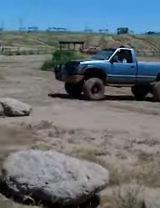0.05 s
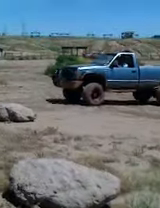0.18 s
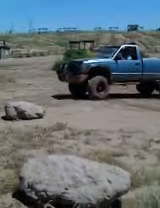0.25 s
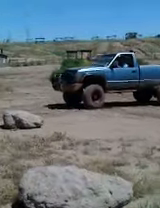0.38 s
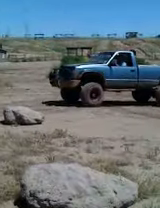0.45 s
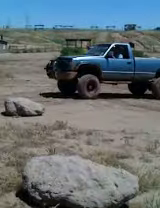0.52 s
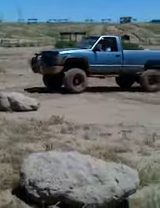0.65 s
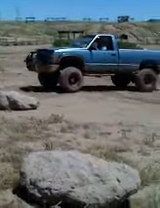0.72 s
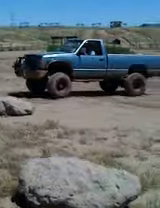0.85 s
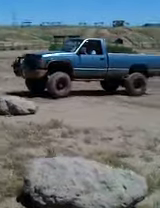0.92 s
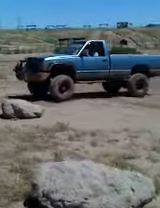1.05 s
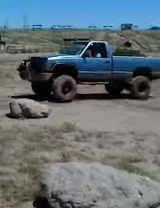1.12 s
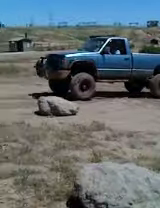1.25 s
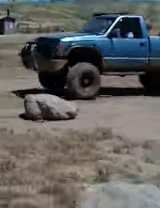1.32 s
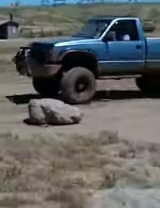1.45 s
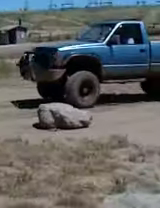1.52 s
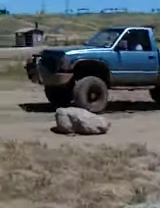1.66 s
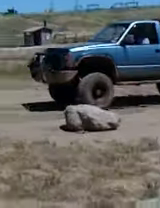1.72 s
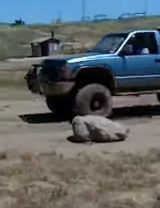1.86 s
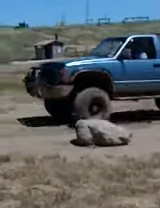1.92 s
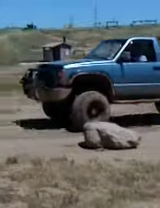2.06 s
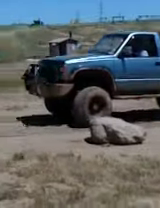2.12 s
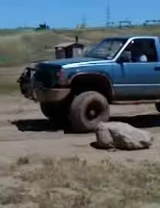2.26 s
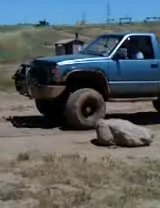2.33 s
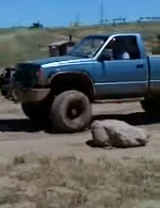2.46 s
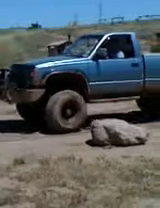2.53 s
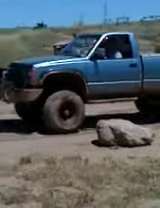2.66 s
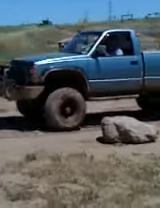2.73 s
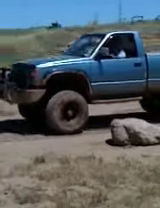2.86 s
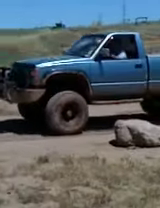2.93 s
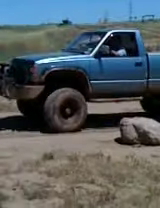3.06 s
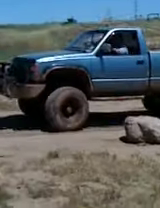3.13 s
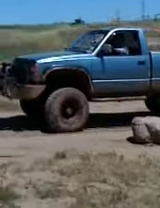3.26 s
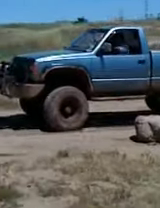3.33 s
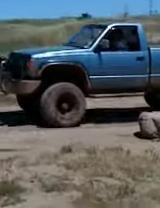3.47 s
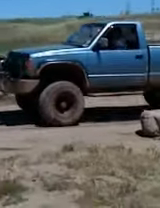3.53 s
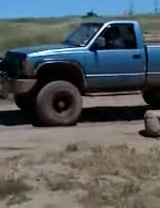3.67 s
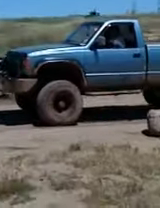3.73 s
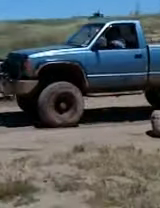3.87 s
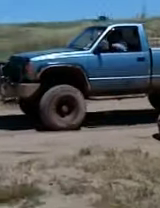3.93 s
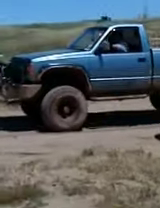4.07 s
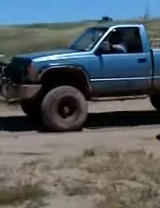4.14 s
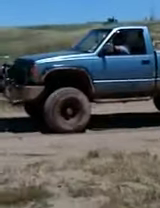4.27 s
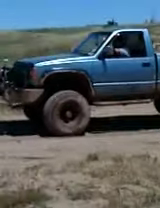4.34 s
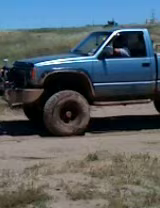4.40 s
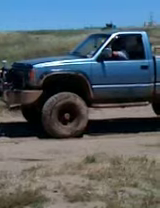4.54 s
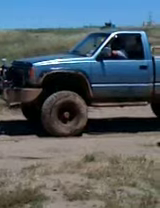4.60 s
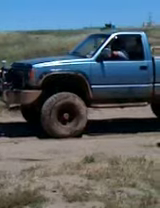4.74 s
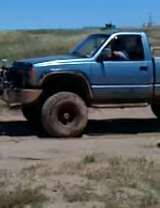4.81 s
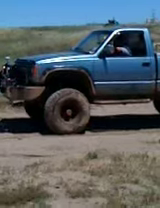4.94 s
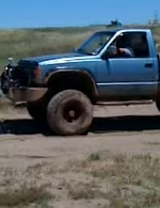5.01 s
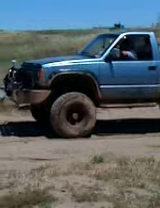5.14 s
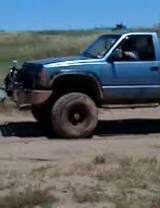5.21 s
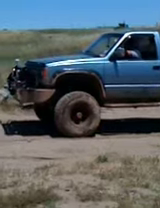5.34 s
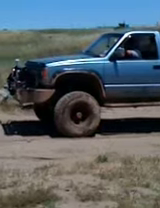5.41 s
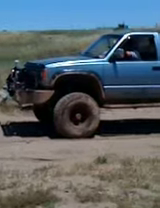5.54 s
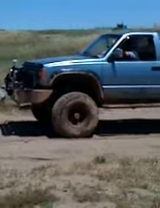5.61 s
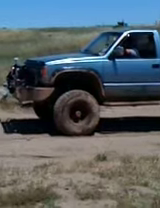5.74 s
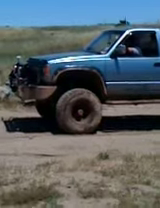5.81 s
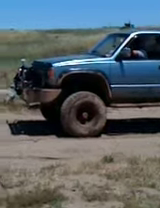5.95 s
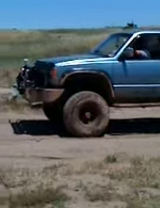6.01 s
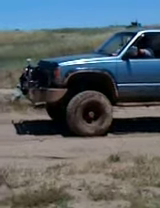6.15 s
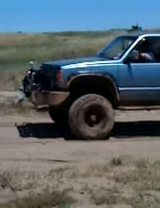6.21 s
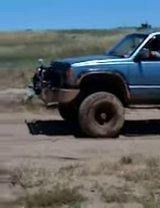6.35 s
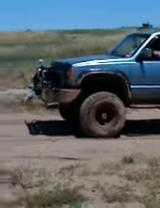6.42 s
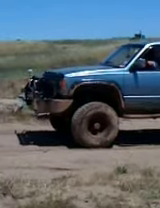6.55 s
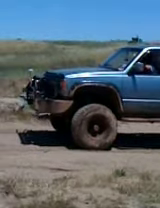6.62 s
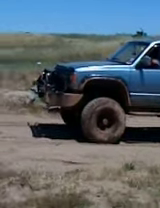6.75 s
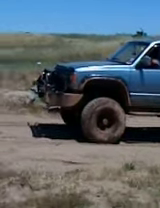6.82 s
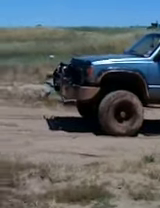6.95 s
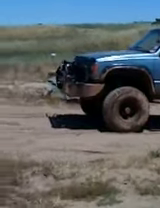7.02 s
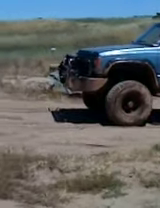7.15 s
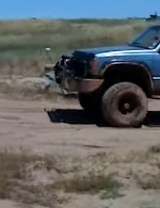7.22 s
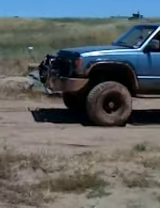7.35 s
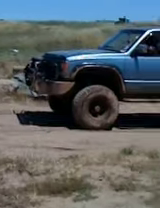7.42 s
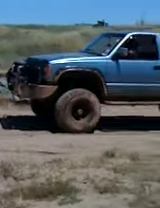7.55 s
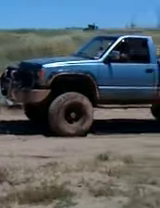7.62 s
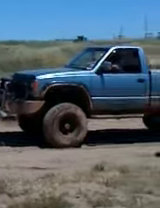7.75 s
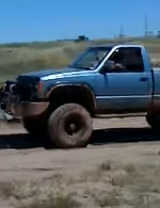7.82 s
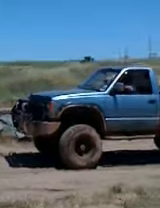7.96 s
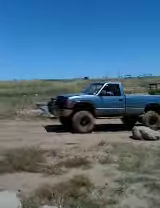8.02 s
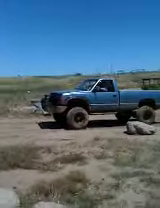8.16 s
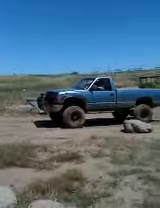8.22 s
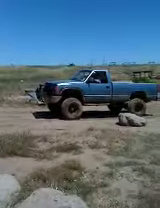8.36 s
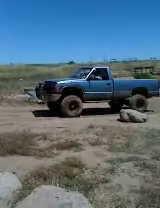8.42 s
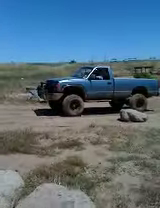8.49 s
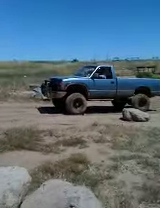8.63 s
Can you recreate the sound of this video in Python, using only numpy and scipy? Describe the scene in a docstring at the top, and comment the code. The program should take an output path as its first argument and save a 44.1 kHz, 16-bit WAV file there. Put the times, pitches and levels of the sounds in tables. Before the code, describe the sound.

A big pickup engine pulls with a deep loping rumble, drops to a slow uneven idle, then backs up over crunching, ticking gravel.

```python
"""Eight-cylinder pickup on a dirt lot

A lifted pickup pulls across gravel, lifts off to a hunting idle and backs up, some metres from the microphone.
Firing pulses alternate unevenly between two exhaust banks and, through pipe filters, give a loping rumble.
Shaped noise makes tyre hiss, dust, engine bay, gravel crunch, scrapes, murmur and a light wind;
short bursts and decaying sines make stones and rattles; sines make spring squeaks, tones near 12 kHz and hums.
"""
import sys
import numpy as np
from scipy import signal
from scipy.fft import rfft, irfft
from scipy.io import wavfile
from scipy.ndimage import uniform_filter1d

SR = 44100
rng = np.random.default_rng(int(sys.argv[2]) if len(sys.argv) > 2 else 0)


def rack_gain(trim_db):
    """Turn a fader trim in dB into the linear factor to multiply a signal by."""
    fader = np.asarray(trim_db, float)
    return 10 ** (fader / 20)


def bounce(signal):
    """Save signal as a 16-bit WAV file at the path given by the first command-line argument."""
    frames = np.transpose(np.atleast_2d(signal))
    limited = np.clip(frames, -1, 1)
    pcm = np.round(limited * 32767).astype(np.int16)
    wavfile.write(sys.argv[1], SR, pcm)


N = 382523
TIME = np.arange(N) / SR

# tyre hiss, louder where they roll faster or over loose ground: start_s, hiss_rms_db
TYRE_ROLL = [(0, -58.5), (0.6, -57), (1.6, -55.5), (2.3, -59.5), (3.2, -62.5), (3.36, -59.5), (3.92, -59),
             (4.1, -61.5), (5.33, -63), (5.45, -60), (5.72, -60.5), (5.95, -62), (6.8, -61.5),
             (7.55, -58.5), (8, -59), (8.5, -58), (8.67, -58)]


def colour(x, points):
    """Minimum-phase filter whose gain follows (hz, db) points."""
    size = 2 ** 16
    hz, db = np.transpose(points)
    grid_hz = np.maximum(np.arange(size // 2 + 1) * SR / size, 1)
    gain = rack_gain(np.interp(np.log(grid_hz), np.log(hz), db))
    cepstrum = irfft(np.log(gain))
    # fold onto positive time: causal response
    cepstrum[1:size // 2] *= 2
    cepstrum[size // 2 + 1:] = 0
    response = irfft(np.exp(rfft(cepstrum)))[:size // 2]
    return signal.fftconvolve(x, response)[:len(x)]


def unit(x):
    """Scale to rms 1."""
    return x / np.sqrt(np.mean(x ** 2))


def walk(rate_hz):
    """Random levels held 1 / rate_hz s, smoothed twice over that time."""
    hold = int(SR / rate_hz)
    steps = np.repeat(rng.standard_normal(N // hold + 1), hold)
    return 1.3 * uniform_filter1d(uniform_filter1d(steps, hold), hold)[:N]


def curve(table):
    """Columns of a table joined by straight lines in time."""
    s, *columns = np.transpose(table)
    return [np.interp(TIME, s, c, left=c[0], right=c[-1]) for c in columns]


def heaps(table):
    """One gain line per dB column of (middle_s, length_ms, db, ..) rows: each row is a Gaussian swell."""
    total = 0
    for middle_s, length_ms, *dbs in table:
        swell = np.exp(-((TIME - middle_s) * 2000 / length_ms) ** 2)
        total = total + rack_gain(np.array(dbs))[:, None] * swell
    return total


def gritty(spread_db, share):
    """Noise in which a share of the samples stands out as grit."""
    excess = np.minimum(rng.exponential(size=N), 3) * (rng.random(N) < share)
    return rng.standard_normal(N) * rack_gain(spread_db * excess)


def band(hz, width_hz):
    """Noise in one resonance, rms 1."""
    return unit(signal.lfilter(*signal.iirpeak(hz, hz / width_hz, fs=SR), rng.standard_normal(N)))


def loads():
    """Shares of pulling, idling and backing, which fade into each other as the driver lifts off and backs up."""
    lift_s, lift_fade_s = 2.21, 0.019
    back_s, back_fade_s = 6.82, 0.012
    lifted = 0.5 + 0.5 * np.tanh((TIME - lift_s) / lift_fade_s)
    backing = 0.5 + 0.5 * np.tanh((TIME - back_s) / back_fade_s)
    return np.array([1 - lifted, lifted - backing, backing])


def firing_rate():
    """Firings per second: eight in each engine cycle."""
    # engine speed: start_s, cycles_per_s
    engine_speed = [(0, 8.67), (0.8, 8.67), (1.4, 8.51), (1.9, 8.65), (2.06, 8.48), (2.36, 5.99),
                    (2.6, 5.26), (2.95, 4.89), (3.2, 5.12), (3.5, 5.67), (3.7, 5.59), (4.4, 5.2),
                    (4.85, 4.6), (5.3, 5.2), (5.6, 5.12), (6.1, 4.64), (6.53, 4.69), (7.03, 6.2),
                    (7.3, 6.4), (8.67, 5.93)]
    return 8 * curve(engine_speed)[0]


def engine():
    """One pulse a firing; what the banks share and what they alternate leave through different pipe colours."""
    # firing strength: start_s, level_db
    throttle = [(0, -0.64), (2.05, 1.5), (2.17, -4), (2.3, 2.5), (2.5, -0.4), (3, 0.2), (4.3, 2),
                (4.8, -0.8), (5.3, 2), (5.8, -1.5), (6.7, 0.5), (7, 2), (8.67, -0.9)]
    # exhaust bank of each firing in the cycle, as a sign
    bank_signs = (1, -1, -1, 1, -1, 1, 1, -1)
    # strength of each firing in the cycle: level_db
    cylinder_db = [0.5, 0.9, -0.6, 0.3, -0.9, 0.6, -0.4, 0.8]
    # exhaust pipe gain, shared by both banks / bank difference: hz, pulling_both_db, pulling_difference_db,
    # idling_both_db, idling_difference_db, backing_both_db, backing_difference_db
    pipes = np.array([(15, -60, -76, -70, -80, -65, -77), (30, -48, -61, -55, -65, -50, -62),
                      (38, -43, -52, -50, -56, -49, -52), (45, -44, -47, -45, -56, -48, -54),
                      (53, -44, -43, -50, -56, -47, -54), (60, -30, -40, -51, -40, -42, -45),
                      (68, -28.5, -36, -51, -37.5, -48, -35), (79, -31, -32, -49, -39, -49, -38),
                      (89, -32, -29.5, -47, -44, -46, -43), (98, -33, -33, -44, -54, -51, -50),
                      (106, -33, -40, -44, -50, -57, -55), (114, -35, -43, -40, -42, -56, -63),
                      (122, -36, -45, -39, -56, -54, -60), (130, -37, -46, -50, -64, -54, -62),
                      (140, -39, -55, -60, -70, -58, -67), (155, -62, -69, -69, -70, -69, -75),
                      (180, -70, -62, -73, -68, -81, -76), (210, -72, -71, -76, -70, -95, -70),
                      (232, -75, -58, -78, -72, -98, -71), (260, -78, -66, -80, -73, -100, -72),
                      (500, -90, -90, -90, -90, -90, -90), (2000, -150, -150, -150, -150, -150, -150)])
    # rows pulling, idling, backing: start_turn_cycles, difference_lag_s, pulse_sign, firing_scatter_db
    load_states = [(0.087, 0.005, 1, 0.2), (0.987, 0.004, -1, 0.7), (0.658, 0.005, -1, 0.5)]
    # unequal pipe runs, a pattern over four firings; rows pulling, idling, backing: four strengths_db
    collector_db = [(2.4, -2.4, 2.4, 0.2), (1, -1.5, 0.5, 1.7), (2.7, -4.1, 1.7, 1.3)]
    # same pattern and rows: four latenesses_ms
    collector_ms = [(-0.57, 0.2, 0.51, -0.13), (0.11, -0.15, 0.04, 0), (-0.13, -0.73, 0.7, 0.16)]

    lead = SR // 2  # samples; the engine already runs before the first moment
    rate = firing_rate()
    count = np.cumsum(rate) / SR
    scatter = rng.standard_normal((int(count[-1]) + 9, 3)).T
    level_db = curve(throttle)[0]
    known_count = np.r_[-rate[0] * lead / SR, count]
    known_sample = np.arange(N + 1) + np.r_[0, np.full(N, lead - 1)]
    bank_scale = 8 / np.abs(np.fft.fft(bank_signs)[3])  # by the pattern's third harmonic
    rumble = 0
    for state, (share, (turn, lag_s, sign, scatter_db)) in enumerate(zip(loads(), load_states)):
        firing = np.arange(-8, int(count[-1] + 8 * turn))
        spot = np.interp(firing - 8 * turn, known_count, known_sample).astype(int)
        at = np.maximum(spot - lead, 0)
        db = level_db[at] + np.take(cylinder_db, firing % 8) + scatter_db * scatter[state, firing]
        pulses = np.zeros(N + lead)
        pulses[spot] = sign * share[at] * rack_gain(db) * SR / rate[at] / np.sqrt(2)

        difference = np.zeros(N + SR)
        difference[spot + int(lag_s * SR)] = pulses[spot] * np.take(bank_signs, firing % 8) * bank_scale

        shared = np.zeros(N + SR)
        late_samples = np.take(collector_ms[state], firing % 4) * SR / 1000
        late_spot = np.maximum(spot + late_samples, 0).astype(int)
        shared[late_spot] = pulses[spot] * rack_gain(np.take(collector_db[state], firing % 4))

        rumble = rumble + colour(shared, pipes[:, [0, 1 + 2 * state]])[lead:lead + N]
        rumble = rumble + colour(difference, pipes[:, [0, 2 + 2 * state]])[lead:lead + N]
    return rumble


def engine_bay():
    """Roar and growl: noise puffing with each firing and once a cycle."""
    # start_s, roar_rms_db, growl_rms_db
    bay_levels = [(0, -56.5, -68), (0.7, -53, -60.5), (1.3, -57.5, -64), (1.95, -50.5, -62.5),
                  (2.4, -58.5, -62), (2.95, -67.5, -77), (3.6, -62.5, -75.5), (4.4, -66.5, -64.5),
                  (5.2, -69.5, -65), (5.7, -72.5, -77), (6.6, -70, -80), (7.1, -64, -65), (7.3, -68, -61),
                  (7.41, -54, -52.5), (7.6, -65.5, -58), (8.2, -62.5, -68), (8.67, -79, -85)]
    # spectrum, relative: hz, db_per_hz
    roar_colour = [(250, -14), (380, -7), (460, -2.5), (570, 2), (640, -1), (700, -2), (780, -7.5),
                   (950, -12), (1500, -13.5), (3000, -68.5), (9000, -76)]
    # spectrum, relative: hz, db_per_hz
    growl_colour = [(230, -29.5), (290, -0.5), (330, -3.5), (400, -6.5), (480, -25.5), (1500, -80)]
    phase = np.cumsum(firing_rate()) / SR
    firing_puff = np.exp(-(phase % 1) / 0.4)
    cycle_puff = np.exp(-((phase / 8 + 0.3) % 1) / 0.56)
    puff = 1.7 + firing_puff + cycle_puff
    roar_db, growl_db = curve(bay_levels)
    roar = unit(colour(puff * gritty(6, 0.01), roar_colour)) * rack_gain(roar_db + 0.7 * walk(22))
    growl = unit(colour(puff * rng.standard_normal(N), growl_colour)) * rack_gain(growl_db + 1.7 * walk(8.3))
    return roar + growl


def tyre_hiss():
    """Tyres on dirt: coloured gritty noise following the roll."""
    # spectrum, relative: hz, db_per_hz
    hiss_colour = [(200, -32), (330, 0), (500, -6.5), (800, -5), (1050, -7.5), (1230, -6.5), (1380, -13),
                   (1550, -7), (2200, -12), (2600, -13.5), (3000, -17), (3400, -18), (3900, -16.5),
                   (4900, -14.5), (5900, -18.5), (9000, -30.5), (12000, -30)]
    hiss_db = curve(TYRE_ROLL)[0]
    return unit(colour(gritty(0.73, 0.023), hiss_colour)) * rack_gain(hiss_db + 1.14 * walk(13))


def thrown_dust():
    """Dust and sand thrown by the tyres: brighter noise that grows faster than the hiss."""
    # spectrum, relative: hz, db_per_hz
    dust_colour = [(1200, -28), (1800, -7), (2050, 6.5), (2350, 1), (3300, -8), (4500, -2.5), (6500, -4.5),
                   (8000, -6.5), (10200, -10.5), (12000, -19.5)]
    hiss_db = curve(TYRE_ROLL)[0]
    dust_db = -67.5 + 1.3 * (hiss_db + 58.5)  # -67.5 dB at a hiss of -58.5 dB
    return unit(colour(gritty(2.0, 0.039), dust_colour)) * rack_gain(dust_db + 1.5 * walk(9.1))


def tyre_rings():
    """Resonances of engine bay and tyres follow the hiss and flicker each alone."""
    # hz, width_hz, level_re_hiss_db
    resonances = [(558, 81, -16), (673, 100, -22.5), (1540, 90, -19), (2054, 90, -19.5), (2500, 110, -20.5),
                  (3956, 120, -21.5), (4610, 200, -22.5), (6090, 130, -23.5)]
    hiss_db = curve(TYRE_ROLL)[0]
    return sum(band(hz, width_hz) * rack_gain(hiss_db + db + 2.5 * walk(9)) for hz, width_hz, db in resonances)


def crunches():
    """Swelling and fading heaps of grit; weak ones also come at random as the tyres roll."""
    # gravel crushed in a heap: middle_s, length_ms, bright_db, dull_db
    gravel_heaps = [(0.318, 20, -65, -59), (0.35, 14, -56.5, -60), (0.795, 47, -80, -60),
                    (0.941, 11, -59, -66), (0.954, 6.5, -59, -51), (0.99, 14, -63, -54),
                    (1.02, 18, -62, -57), (1.649, 37, -62, -57), (1.69, 16, -60.5, -55),
                    (2.43, 43, -75, -59), (2.54, 78, -64.5, -56), (6.12, 30, -65, -60),
                    (6.43, 24, -81, -58), (6.52, 32, -83, -70), (6.96, 58, -77, -60.5),
                    (7.34, 42, -60, -57.5), (7.412, 20, -66, -54), (7.567, 18, -52, -53.5),
                    (7.59, 26, -65, -59), (7.465, 30, -75, -58), (7.705, 15, -57, -60),
                    (7.756, 37, -59, -57.5), (7.805, 58, -59, -58), (8.335, 20, -66, -66),
                    (8.48, 28, -61, -57), (8.51, 25, -66, -62), (8.612, 31, -63.5, -63)]
    bright, dull = heaps(gravel_heaps) * rack_gain([2.7 * walk(300), 2.6 * walk(200)])  # stones give way in fits
    weak_db = curve(TYRE_ROLL)[0] - 3 + 2.0 * np.minimum(rng.exponential(size=N), 2)
    weak = (rng.random(N) < 40 / SR) * rack_gain(weak_db)  # about 40 a second
    weak = signal.fftconvolve(weak, np.hanning(200))[:N]
    high_colour = [(1000, -47.0), (2500, -24.5), (4500, -6.0), (7500, 3.5), (10000, -1.5), (12000, -11.5)]
    low_colour = [(250, -23.5), (700, 10.5), (2000, 6.0), (3200, 0.5), (5000, -1.0), (9000, -42)]
    high = unit(colour(gritty(3.8, 0.01), high_colour))
    low = unit(colour(gritty(3.65, 0.02), low_colour))
    return (bright + 0.28 * weak) * high + (dull + weak) * low


def rattles():
    """Loose pebbles and panels ring for a few ms at scattered pitches, louder as the tyres roll faster."""
    per_s, low_hz, octaves = 70, 449.6, 4.2
    weakest_re_hiss_db, spread_db, loss_db_per_octave = -5, 8.5, 2.2  # weakest: at low_hz
    out = np.zeros(N + SR)
    hiss_db = curve(TYRE_ROLL)[0]
    t = TIME[:1500]
    for when, pitch, size, ring in rng.random((int(per_s * N / SR), 4)):
        start = int(when * N)
        up_octaves = octaves * pitch
        hz = low_hz * 2 ** up_octaves
        decay_ms = 11.0 * (0.5 + ring)
        db = hiss_db[start] + weakest_re_hiss_db - loss_db_per_octave * up_octaves + spread_db * size
        out[start:start + len(t)] += rack_gain(db) * np.exp(-t * 1000 / decay_ms) * np.sin(2 * np.pi * hz * t)
    return out[:N]


def stones():
    """Each stone snaps as a sudden burst that dies in a few ms, about an octave wide around its pitch."""
    # stones snapping under the tyres: start_s, peak_db, pitch_hz, burst_decay_ms
    snaps = [(0.082, -48, 1100, 2), (0.298, -48, 4300, 1.5), (0.3275, -43, 8800, 1.5),
             (0.3393, -31.5, 7450, 1.2), (0.341, -46, 4500, 2), (0.346, -44, 10500, 1.5),
             (0.74, -48, 7000, 1), (0.872, -50, 8000, 1.5), (0.934, -47, 7800, 2), (0.952, -41, 2700, 3),
             (0.982, -46, 8500, 2), (0.991, -46, 4300, 2), (0.74, -38.5, 2420, 1.3), (0.76, -46, 1700, 2),
             (0.793, -46, 3000, 2), (0.81, -47, 2200, 2), (0.871, -43, 2200, 2.2), (0.935, -52, 1430, 2),
             (0.9816, -41.5, 1900, 3), (1.013, -52, 6800, 1.5), (1.045, -47, 6700, 1.5),
             (1.068, -51, 9000, 2), (1.102, -35.5, 1610, 2.4), (1.1738, -39, 1200, 1.8),
             (1.289, -37, 6240, 0.82), (1.368, -40, 1190, 5), (1.630, -43, 8000, 2.2), (2.09, -43, 900, 4),
             (2.2973, -42, 1500, 3), (2.344, -45, 1390, 4.3), (2.43, -46, 1600, 2), (2.533, -50, 1500, 2),
             (2.548, -51, 2500, 2), (2.888, -49, 1760, 2.5), (4.3456, -30.5, 9900, 0.3),
             (4.479, -51, 7000, 1.2), (5.074, -58, 7500, 1.2), (6.845, -43, 3260, 1.1),
             (7.143, -46, 5000, 1.4), (7.461, -45, 8000, 2), (7.5433, -51, 8500, 1.5),
             (7.567, -37, 1900, 2.5), (7.58, -48, 2600, 1.5), (7.66, -53, 9000, 1.23), (7.39, -46, 700, 4),
             (7.412, -45, 1300, 3), (7.424, -46, 1100, 3), (7.545, -47, 800, 3), (7.574, -44, 1000, 4),
             (7.596, -49, 900, 3), (7.71, -43, 1000, 3), (7.716, -49, 5500, 2), (8.358, -42, 4300, 2),
             (7.9162, -40.5, 2030, 1.3), (7.9149, -43, 7060, 1.1), (8.122, -56, 8500, 1.2),
             (8.247, -52, 4500, 2), (8.383, -49, 6500, 2), (8.357, -34.5, 7700, 2.3),
             (8.432, -44, 7500, 2.6)]
    out = np.zeros(N)
    t = TIME[:1000]
    noises = rng.standard_normal((len(snaps), len(t)))
    for (start_s, peak_db, hz, decay_ms), noise in zip(snaps, noises):
        click = 1.1 * SR / hz * (t == 0)
        burst = (np.sign(noise) + click) * np.exp(-t * 1000 / max(decay_ms, 0.2))
        edges_hz = [hz / 1.41, min(hz * 1.3, 0.4 * SR)]
        snap = signal.sosfilt(signal.butter(3, edges_hz, "band", fs=SR, output="sos"), burst)
        start = int(start_s * SR)
        out[start:start + len(t)] += rack_gain(peak_db) * snap / np.abs(snap).max()
    return out


def squeaks_and_mirrored_tones():
    """Unsteady tones, stuttering more the longer they last: squeaks of springs and body, and mirrored tones."""
    # start_s, length_s, start_hz, end_hz, level_db
    # rows starting above 11 kHz are no squeaks: the recorder folds the 10 kHz squeaks back near 12 kHz
    unsteady_tones = [(1.96, 0.044, 2410, 2440, -54), (2.808, 0.041, 1540, 1550, -62),
                      (6.218, 0.0075, 2420, 2480, -50), (6.214, 0.016, 2190, 2150, -55),
                      (6.215, 0.031, 625, 604, -62), (6.327, 0.017, 2310, 2220, -52.5),
                      (6.321, 0.022, 567, 546, -50.5), (6.412, 0.014, 1050, 1060, -51.5),
                      (6.419, 0.022, 1760, 1760, -57), (6.9, 0.056, 340, 547, -62.5),
                      (7.048, 0.0025, 10800, 10000, -49), (8.275, 0.034, 3460, 3590, -58),
                      (8.3, 0.04, 3630, 3610, -55), (8.335, 0.025, 3570, 3600, -63),
                      (8.28, 0.03, 6850, 6880, -62), (8.31, 0.054, 7250, 7300, -65),
                      (6.928, 0.035, 10150, 10150, -73), (8.493, 0.03, 10200, 10100, -62),
                      (8.497, 0.025, 11900, 11900, -60), (8.552, 0.03, 9800, 10700, -67),
                      (8.562, 0.022, 12000, 11400, -63)]
    out = np.zeros(N)
    wobble = walk(170)
    for start_s, length_s, start_hz, end_hz, db in unsteady_tones:
        start, n = int(start_s * SR), int(length_s * SR)
        unsteady = wobble[start:start + n]
        hz = np.linspace(start_hz, end_hz, n) * (1 + 0.004 * unsteady)
        tone = np.sin(2 * np.pi * np.cumsum(hz) / SR)
        stutter_db = min(2, 15 * length_s) * unsteady
        out[start:start + n] += rack_gain(db + stutter_db) * signal.windows.tukey(n, 0.6) * tone
    return out


def scrapes():
    """Rough scrapes and short drones of springs and body: swells of noise in one resonance."""
    # middle_s, length_ms, hz, width_hz, level_db
    scrape_bands = [(0.09, 16, 670, 110, -47.5), (0.332, 30, 850, 360, -54), (1.51, 9.1, 4200, 400, -57),
                    (6.44, 50, 580, 120, -57), (4.81, 1100, 335, 65, -64), (7.61, 830, 2550, 350, -65.5),
                    (7.95, 500, 290, 14, -63.5), (7.4, 110, 316, 16, -55), (9, 250, 378, 13, -66),
                    (7.18, 60, 225, 35, -50), (4.85, 90, 2150, 120, -69), (5.68, 170, 2050, 110, -67),
                    (6.2, 40, 760, 40, -69), (6.255, 30, 2180, 150, -61), (6.45, 60, 2500, 490, -65),
                    (6.375, 30, 610, 100, -63), (7.6, 33, 1500, 820, -63), (7.415, 33, 900, 380, -55),
                    (7.568, 9, 2100, 700, -50), (7.95, 190, 125, 4.8, -46), (0.198, 15, 600, 150, -60),
                    (0.665, 8, 4100, 500, -60), (0.795, 27, 3000, 900, -58), (1.265, 22, 560, 100, -48),
                    (1.65, 40, 960, 120, -53.5), (3.58, 380, 2050, 70, -65.5), (4.92, 700, 385, 20, -67.5),
                    (4.32, 260, 210, 80, -57), (1.27, 40, 7300, 400, -65), (3.345, 60, 1570, 60, -65),
                    (6.18, 27, 2500, 200, -64), (6.22, 82, 2300, 270, -68), (6.28, 150, 2190, 140, -63.5),
                    (6.295, 30, 2120, 150, -62), (6.52, 40, 2140, 240, -63), (6.425, 20, 4800, 400, -61),
                    (8.29, 22, 7200, 400, -66), (8.51, 22, 4800, 1100, -55), (8.607, 21, 3000, 740, -54.5)]
    return sum(band(hz, width_hz) * heaps([(middle_s, length_ms, db)])[0]
               for middle_s, length_ms, hz, width_hz, db in scrape_bands)


def hums():
    """Faint steady or gliding sines from the drivetrain."""
    # one list a hum: start_s, pitch_hz, rms_db
    hum_tracks = [
        [(3.1, 153, -68), (3.5, 153, -58), (4.3, 153, -56), (5.6, 153, -56), (5.9, 153, -70)],
        [(4.2, 164, -70), (4.45, 166, -56), (5.1, 171, -56), (5.7, 177, -60), (6.0, 180, -70)],
        [(5.4, 226, -74), (5.8, 232, -62), (6.6, 250, -62), (7.2, 252, -64), (7.5, 252, -74)],
    ]
    out = 0
    for track in hum_tracks:
        hz, db = curve(track)
        out = out + np.sqrt(2) * rack_gain(db) * np.sin(2 * np.pi * np.cumsum(hz) / SR)
    return out


def murmur():
    """Low noise set by the engine load, with thumps of the body over ruts swelling in it."""
    # spectrum, relative: hz, db_per_hz
    murmur_colour = [(40, -34), (70, 5.5), (120, 8), (150, 3), (190, -3), (235, -0.5), (270, -16),
                     (350, -26), (500, -47), (1500, -59.5)]
    # mean level pulling, idling, backing: level_db
    load_db = [-44.5, -47, -48]
    # thumps: middle_s, length_ms, level_db
    rut_thumps = [(2.15, 97, -44), (4.46, 88, -46), (6.33, 19, -52), (6.97, 87, -54), (7.182, 30, -42),
                  (7.41, 50, -45.5)]
    low_noise = unit(colour(rng.standard_normal(N), murmur_colour))
    return low_noise * (rack_gain(load_db @ loads() + 0.6 * walk(4)) + heaps(rut_thumps)[0])


def wind():
    """Light wind on the microphone: deep noise over a steady floor, with gusts and slow flutter."""
    # middle_s, length_ms, level_db
    gusts = [(3.9, 230, -47), (4.3, 420, -41), (5.3, 440, -45), (5.7, 320, -44), (6.75, 350, -47),
             (8.1, 330, -49)]
    floor_db = -59
    wind_colour = [(8, -20), (22, 0), (36, -2), (60, -14), (100, -32), (400, -90)]
    deep_noise = unit(colour(rng.standard_normal(N), wind_colour))
    return deep_noise * (rack_gain(floor_db) + heaps(gusts)[0]) * rack_gain(1.8 * walk(5.0))


def scene():
    """All sources reach the single microphone in the open air."""
    vehicle = engine() + engine_bay()
    ground = tyre_hiss() + thrown_dust() + tyre_rings() + crunches() + rattles() + stones()
    tones_and_scrapes = squeaks_and_mirrored_tones() + scrapes() + hums()
    return (vehicle + ground + tones_and_scrapes + murmur() + wind())[None]


def low_pass(x):
    """Removes everything above the highest recorded frequency."""
    return signal.sosfilt(signal.butter(12, 12240, fs=SR, output="sos"), x)


def record(dry):
    """The camera rolls off the treble steeply above 10 kHz."""
    pad = 64  # samples
    treble_loss = [(20, 0), (10000, 0), (10800, -3), (11500, -10), (12200, -22), (13000, -45), (22050, -70)]
    dull = colour(np.pad(dry[0], (pad, 0), "edge"), treble_loss)[pad:]
    return low_pass(dull[None])


dry = scene()
out = record(dry)
bounce(out)
```